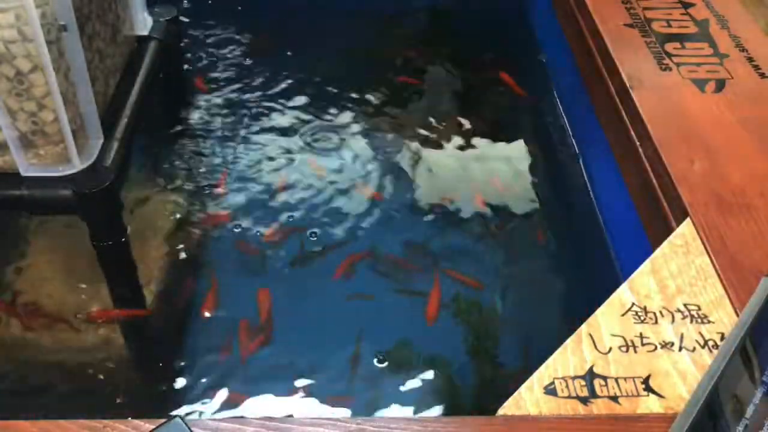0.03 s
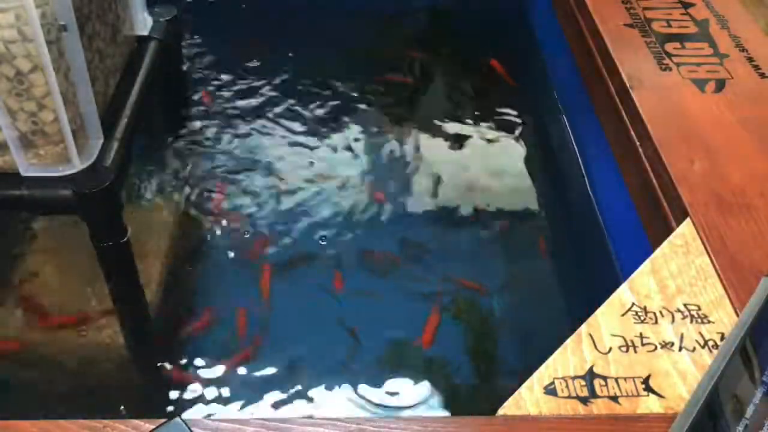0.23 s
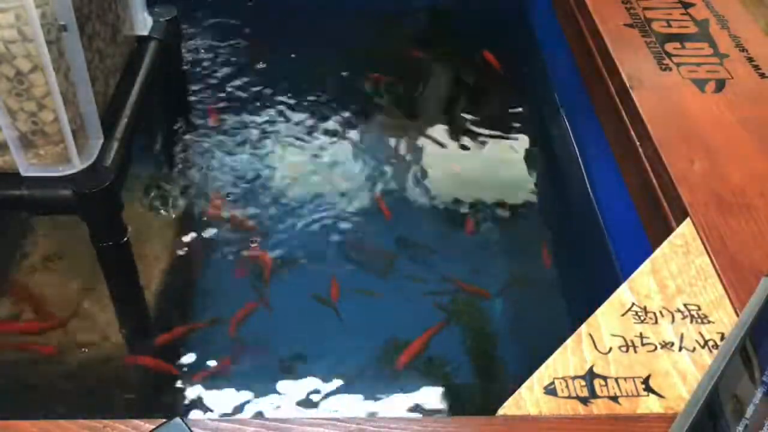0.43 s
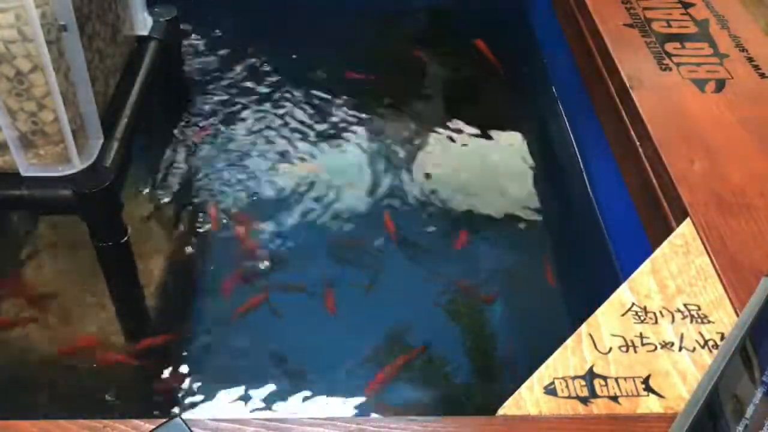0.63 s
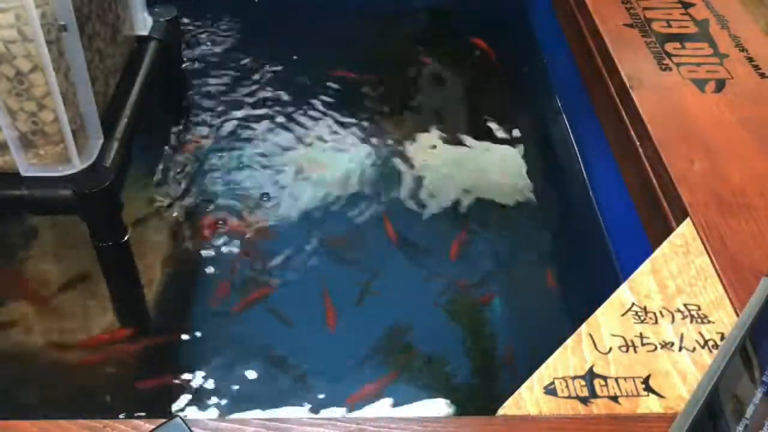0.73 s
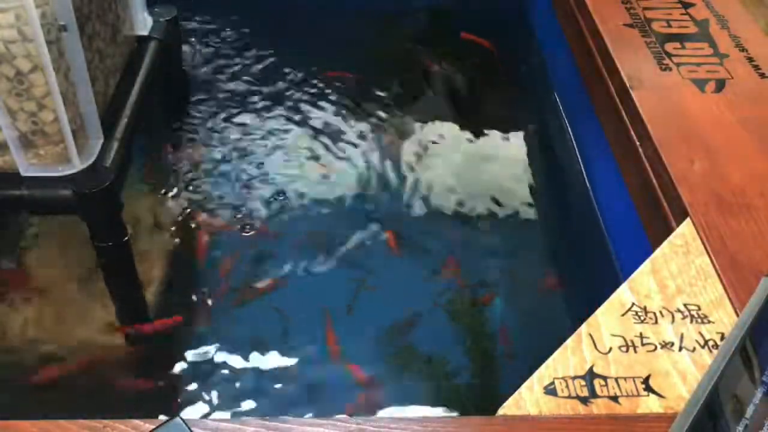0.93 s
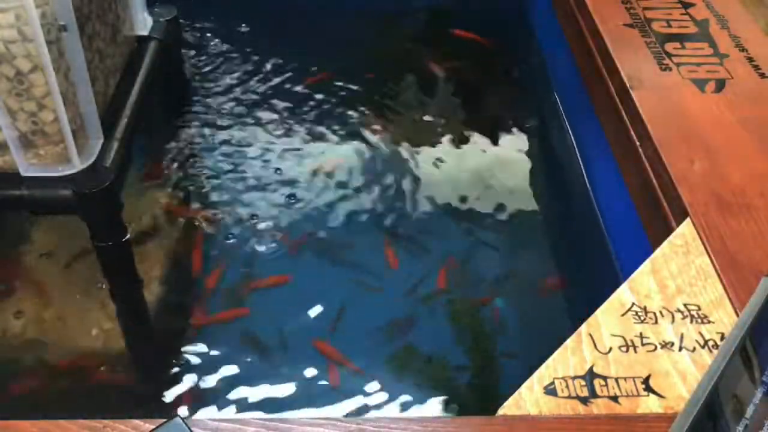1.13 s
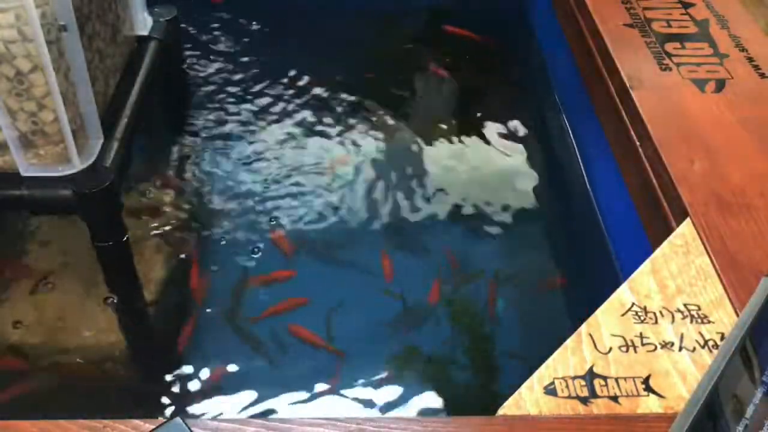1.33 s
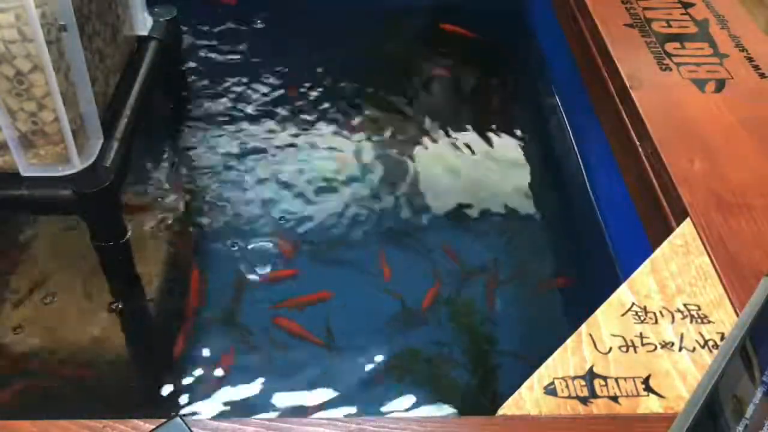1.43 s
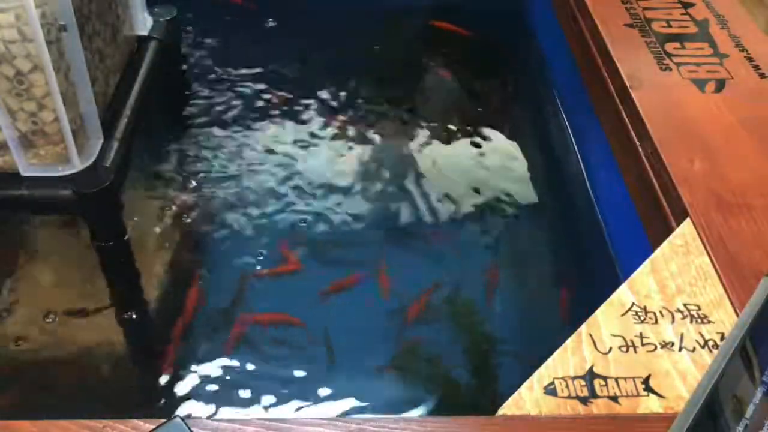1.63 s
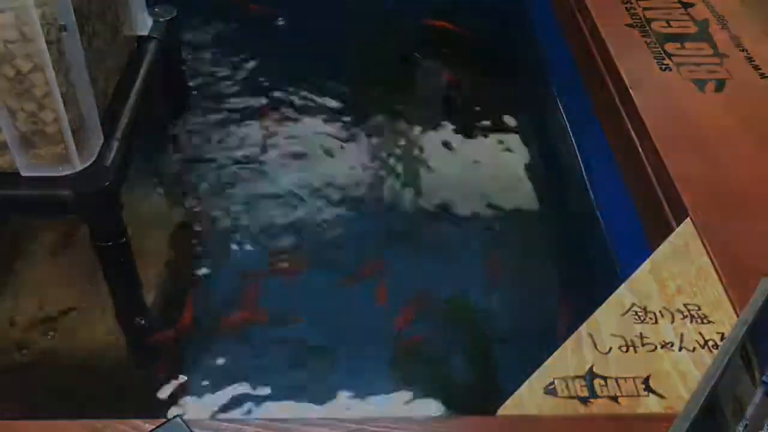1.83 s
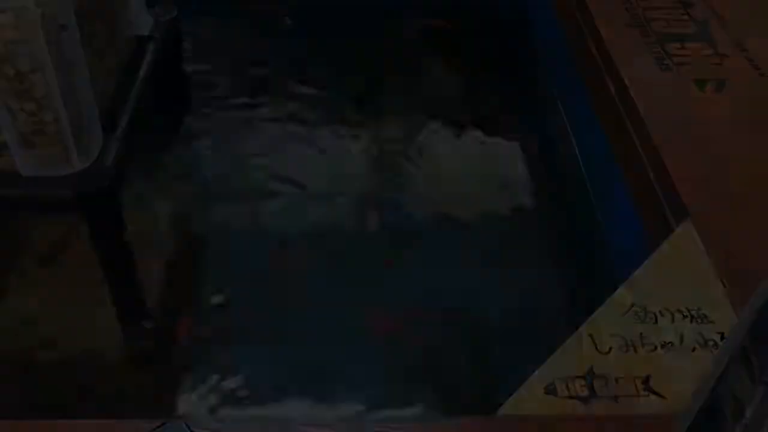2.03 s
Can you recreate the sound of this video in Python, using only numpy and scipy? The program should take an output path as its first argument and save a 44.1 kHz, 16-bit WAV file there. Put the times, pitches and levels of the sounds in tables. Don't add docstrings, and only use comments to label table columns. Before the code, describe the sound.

Water trickles from a filter into an indoor fish pond, with fine hiss, crisp high drips and soft glugs, over a constant low electric pump hum; close microphone, slight room reflections, fading out in the second half.

```python
import sys
import numpy as np
from scipy import signal
from scipy.fft import rfft, irfft, next_fast_len
from scipy.io import wavfile
from scipy.ndimage import uniform_filter1d, map_coordinates

SR = 44100
rng = np.random.default_rng(int(sys.argv[2]) if len(sys.argv) > 2 else 0)


def natural_amplitude(level_db):
    exponent = np.asarray(level_db, float) / 20
    return 10 ** exponent


def int16_out(signal):
    q = np.round(np.clip(np.atleast_2d(signal).T, -1, 1) * 32767)
    wavfile.write(sys.argv[1], SR, q.astype(np.int16))


N = 92610
TIME = np.arange(N) / SR
MAINS_HZ = 50.03


def unit(x):
    return x / np.sqrt(np.mean(x ** 2) + 1e-20)


def wobble(rate):
    knots = rng.standard_normal(int(N * 40 / SR) + 4)
    return map_coordinates(knots, [TIME * rate])


def curve(points):
    return np.interp(TIME, *np.transpose(points))


def filtered(x, response):
    m = next_fast_len(N + 8192)
    return irfft(rfft(x, m) * response(np.fft.rfftfreq(m, 1 / SR)), m)[..., :N]


def coloured(x, points):
    f, v = np.transpose(points)

    def response(hz):
        return natural_amplitude(np.interp(np.log(hz + 1), np.log(f + 1), v, -120, -120))

    return unit(filtered(x, response))


def rush(points, patchy_db):
    z = signal.stft(rng.standard_normal(N + 512), nperseg=256)[2]
    field = uniform_filter1d(rng.standard_normal(z.shape), size=8, axis=0)
    field = uniform_filter1d(field, size=8, axis=1)
    noise = signal.istft(z * natural_amplitude(patchy_db * unit(field)), nperseg=256)[1][:N]
    return coloured(noise, points)


def bubbles(s, gain, hz, cycles, rise, rough, size=700):
    t = np.arange(size) / SR
    life = t * (hz / cycles)[:, None]
    phase = 2 * np.pi * hz[:, None] * t * (1 + rise * life)
    phase = phase + rough * np.cumsum(rng.standard_normal(life.shape), axis=1)
    envelope = np.exp(-3 * life) * (1 - np.exp(-life / 0.044))
    wave = gain[:, None] * np.sin(phase) * envelope
    at = (s * SR).astype(int)[:, None] + np.arange(size)
    return np.bincount(at.ravel(), wave.ravel(), N + size)[:N]


def swarm(count, centre_hz, spread, cycles, size_db, rough, size):
    u, g = rng.random((count, 2)), rng.standard_normal(count)
    hz = np.clip(centre_hz * np.exp(spread * g), 200, 15500)
    gain = natural_amplitude(np.minimum(-size_db * np.log(1 - u[:, 1]), 9.5))
    return unit(bubbles(u[:, 0] * N / SR, gain, hz, cycles + 0 * hz, 0.12, rough, size=size))


def fade():
    start_s, end_s = 1.2, 2.128
    return np.clip((end_s - TIME) / (end_s - start_s), 1e-3, 1)


# (multiple of mains [-], level [dB])
HARMONICS = [(1, -8), (2, 1.5), (3, -34.5), (4, -24.5), (5, -14), (6, -31.5), (7, -31.5), (8, -31.5),
             (9, -21.5), (10, -24.5), (11, -23), (12, -40), (13, -22), (14, -20), (15, -30.5), (16, -39),
             (17, -28.5), (18, -25), (19, -31.5), (20, -21.5), (21, -23), (22, -23.5), (23, -34), (24, -23),
             (25, -28), (26, -26.5), (27, -34), (28, -24.5), (29, -34), (30, -28.5)]
# (time [s], level [dB])
MOTOR_LOAD = [(0, -1.5), (.08, 1), (.23, -2), (.4, 0.5), (.9, 0.5), (1.1, -1), (1.19, 2), (1.3, -1.5),
              (1.45, 0.5), (1.7, 0.5), (1.9, 0.5), (2.1, 4)]


def hum():
    total = 0
    for k, db in HARMONICS:
        level = natural_amplitude(db + 1.04 * wobble(9.2))
        phase = 2 * np.pi * (k * MAINS_HZ * TIME + rng.random()) + 0.13 * wobble(5.9)
        total = total + level * np.sin(phase)
    return np.sqrt(2) * natural_amplitude(-51.5 + curve(MOTOR_LOAD)) * total


# (time [s], rotation [Hz], level [dB])
ROTOR_SPEED = [
    (0, 60.4, -9),
    (.15, 59.67, 3.5),
    (1.15, 57, 3.5),
    (1.38, 56.6, -2),
    (1.48, 66.1, 0.5),
    (2.1, 66.9, -2),
]


def rotor():
    at, hz, effort_db = np.transpose(ROTOR_SPEED)
    level = natural_amplitude(-57.5 + np.interp(TIME, at, effort_db) + wobble(7.9))
    phase = 2 * np.pi * np.cumsum(np.interp(TIME, at, hz)) / SR + 0.19 * wobble(3.3)
    return np.sqrt(2) * level * np.sin(phase)


# (frequency [Hz], density [dB per Hz])
RUMBLE_SPECTRUM = [(20, -32), (40, -6.5), (50, 0), (65, 1.5), (80, -4), (105, -5.5), (128, -8),
                   (150, -15.5), (200, -22.5)]


def rumble():
    return natural_amplitude(-57.5) * rush(RUMBLE_SPECTRUM, patchy_db=-1.2)


# (frequency [Hz], density [dB per Hz])
CASING_SPECTRUM = [(130, -16.5), (230, -1), (310, -12), (520, -4), (800, -12), (1400, -11), (1900, -23.5),
                   (2300, -57)]
# (time [s], level [dB])
CASING_RATTLE = [
    (0, 0.5),
    (.7, -1),
    (1.3, -0.5),
    (1.75, 0),
    (1.9, 1.5),
    (2.1, 7),
]


def casing():
    level = natural_amplitude(-61 + curve(CASING_RATTLE) + 1.2 * wobble(13.63))
    stroke = 1 + 0.27 * np.cos(2 * np.pi * MAINS_HZ * TIME)
    return level * stroke * rush(CASING_SPECTRUM, patchy_db=1.0)


# (time [s], length [s], peak level [dB], pitch [Hz], end over start pitch [-])
AIR_POCKETS = [
    (0, 0.055, -51, 112, 0.88),
    (.27, 0.12, -62, 222, 0.97),
    (.28, .13, -63, 119, 0.96),
    (.5, .14, -61, 126, 1.01),
    (.72, 0.47, -69, 1057, 1.002),
    (.83, .36, -57.5, 108, 1.2),
    (1.96, .11, -73, 151, 1.1),
]


def pipe():
    out = 0
    for s, length, db, hz, glide in AIR_POCKETS:
        u = np.clip((TIME - s) / length, 0, 1)
        phase = 2 * np.pi * hz * length * (u + (glide - 1) * u * u / 2) + 0.85 * wobble(18)
        out = out + np.sqrt(2) * natural_amplitude(db) * np.sin(np.pi * u) ** 2 * np.sin(phase)
    return out / fade()


# (time [s], level [dB])
WATER_FLOW = [
    (0, -61),
    (.15, -60.5),
    (.6, -64),
    (1.2, -64.5),
    (1.7, -63.5),
    (1.95, -61.5),
    (2.1, -60),
]


def flow():
    return natural_amplitude(curve(WATER_FLOW) + 0.22 * wobble(24.66))


# (frequency [Hz], density [dB per Hz])
SPRAY_SPECTRUM = [(1060, -7.5), (1800, -5), (2470, -1), (2840, -4.5), (7640, -5.5), (8750, -4.5),
                  (10300, -5), (14600, -2.5), (15800, 0)]


def spray():
    return rush(SPRAY_SPECTRUM, patchy_db=1.74)


def entrained_air():
    crackle = swarm(count=600, centre_hz=11000, spread=0.3, cycles=23, size_db=-0.5, rough=0.6, size=300)
    crackle = coloured(crackle, [(3000, -36), (6000, -8), (9000, -9), (15800, 0)])
    fizz = swarm(count=350, centre_hz=4510, spread=0.59, cycles=35, size_db=-1.5, rough=0.24, size=500)
    gurgle = swarm(count=120, centre_hz=2480, spread=0.04, cycles=25, size_db=2.5, rough=0.04, size=700)
    glugging = swarm(count=120, centre_hz=726, spread=0.425, cycles=17, size_db=3.5, rough=0.02, size=1500)
    return natural_amplitude(-5.5) * crackle + natural_amplitude(-19) * fizz + natural_amplitude(-27.5) * gurgle + natural_amplitude(-10.5) * glugging


# (time [s], peak level [dB], pitch [Hz], life [cycles])
LOW_DRIPS = [(0.0304, -60, 2440, 82), (0.0428, -55, 2510, 50), (0.121, -58, 2350, 35),
             (0.135, -67, 2460, 43), (.171, -69, 2350, 35), (0.2159, -51.5, 2520, 65),
             (0.2675, -62, 2530, 35), (.3177, -75, 2460, 31), (0.378, -60.5, 2550, 59),
             (0.394, -62, 2340, 45), (.4174, -74, 2470, 35), (0.488, -66, 2440, 35),
             (0.5167, -71, 2450, 40), (.5427, -69, 2425, 35), (.5975, -63, 2480, 35),
             (0.642, -53.5, 2413, 51), (.6863, -62, 2510, 35), (0.7722, -53, 2450, 42),
             (0.7903, -58, 2450, 39), (.8081, -68.5, 2330, 35), (0.8674, -58, 2520, 30),
             (0.886, -56, 2580, 36), (.9921, -63.5, 2510, 35), (1.026, -52, 2353, 63),
             (1.0397, -58, 2520, 55), (1.0514, -57, 2325, 56), (1.1268, -65, 2450, 35),
             (1.1873, -61, 2550, 66), (1.566, -60, 2470, 52), (1.774, -64, 2420, 45),
             (1.799, -72, 2564, 40), (1.83, -66, 2430, 66), (1.8963, -65.5, 2480, 51),
             (1.9122, -64, 2430, 38)]
# (time [s], peak level [dB], pitch [Hz], life [cycles])
HIGH_DRIPS = [(.258, -61, 3700, 45), (.573, -57.5, 4380, 49), (.598, -60.5, 3330, 42),
              (.638, -50, 3530, 30), (.642, -50, 3340, 42), (.68, -58, 3490, 64), (.911, -51, 4620, 40),
              (.925, -61, 4700, 35), (1.145, -60, 5140, 58), (1.198, -58, 4350, 50), (1.259, -60, 3440, 45),
              (1.272, -57, 3470, 55), (1.428, -64, 3550, 38), (1.443, -60.5, 3566, 75),
              (1.482, -60, 3500, 50), (1.722, -63, 3260, 64), (1.868, -67.5, 3370, 81),
              (1.909, -66, 5300, 54), (2.025, -64.5, 4550, 46)]


def drips():
    s, db, hz, cycles = np.transpose(LOW_DRIPS + HIGH_DRIPS)
    ring = bubbles(s, natural_amplitude(db - 3), hz, np.clip(cycles, 30, 90), rise=0.012, rough=0.05, size=1500)
    splash = bubbles(s, natural_amplitude(db - 8), 1.116 * hz, 12 + 0 * hz, rise=0, rough=0.27, size=400)
    return ring + splash


# (time [s], peak level [dB], pitch [Hz], life [cycles])
DROPLETS = [(0.0458, -49, 14600, 36), (0.2553, -43.5, 8860, 42), (0.4614, -49, 14000, 40),
            (0.616, -47.5, 11600, 40), (0.7287, -44, 14400, 37), (0.7741, -48, 14400, 40),
            (0.8305, -49, 15000, 40), (0.8643, -41.5, 14350, 35), (0.8865, -45, 14100, 40),
            (0.9318, -50, 14600, 43), (0.945, -45, 14300, 40), (0.9762, -49.5, 12600, 40),
            (0.9926, -51, 14400, 36), (1.0545, -63, 11200, 37), (1.0545, -40, 13900, 25),
            (1.2875, -46, 12700, 35), (1.4765, -52.5, 8840, 37), (1.494, -50, 13800, 40),
            (1.5422, -47.5, 8860, 27), (1.6492, -51, 14500, 40), (1.6663, -46, 15000, 32),
            (1.797, -55, 10800, 34),
            (0.057, -51, 6140, 33), (.3451, -56.5, 4600, 25), (.3546, -51, 5770, 23),
                   (.5372, -58, 5910, 30), (.5606, -57, 6600, 30), (.7088, -53, 6350, 30),
                   (.8255, -61, 6030, 30), (0.9105, -51, 5340, 18), (1.0136, -59, 5960, 45),
                   (1.3139, -58, 7500, 30), (1.3314, -52.5, 7100, 30), (1.373, -54, 6230, 28),
                   (1.4825, -64, 6580, 30), (1.5419, -62, 5500, 11), (1.584, -59, 5950, 30),
                   (1.6215, -58.5, 6700, 34), (1.8253, -63, 6074, 31), (1.991, -61, 2400, 9),
                   (2.059, -70, 2400, 7.5),
            (0.2568, -48.5, 8400, 35),
    (.837, -54, 11460, 54),
    (1.0484, -48, 13400, 50),
    (1.0734, -55, 9060, 70),
    (1.2644, -52, 14500, 55),
    (1.341, -57, 14000, 55),
    (1.416, -51, 13700, 50),
    (1.457, -56, 13000, 53),
    (1.485, -60, 9100, 45),
    (1.505, -53, 15200, 55),
]


def droplets():
    s, db, hz, cycles = np.transpose(DROPLETS)
    s = s + 0.0008
    ring = bubbles(s, natural_amplitude(db - 1.5), hz, np.clip(1.43 * cycles, 5, 120), rise=0.012, rough=0.4, size=400)
    crack = bubbles(s, natural_amplitude(db - 2.5), 0.95 * hz, 1.12 * cycles, rise=0, rough=0.68, size=400)
    crack = filtered(crack, lambda f: f ** 4 / (f ** 4 + (0.12 * SR) ** 4))
    return ring + crack


# (time [s], peak level [dB], pitch [Hz])
DEEP_GLUGS = [
    (.058, -52.5, 1646),
    (0.239, -55, 1440),
    (.3, -54.5, 680),
    (.63, -52, 1410),
    (1.012, -50.5, 494),
    (1.163, -57, 606),
    (1.183, -51, 513),
    (1.243, -52, 550),
    (1.535, -53.5, 538),
]


def glugs():
    s, db, hz = np.transpose(DEEP_GLUGS)
    return bubbles(s, natural_amplitude(db), hz, 22 + 0 * hz, rise=0.045, rough=0.025, size=2500)


# (delay [s], level [dB])
TANK_WALLS = [
    (.0027, -10),
    (.0061, -13),
    (.0098, -24),
    (0.0148, -12.5),
]


def room(x):
    t60_s, tail_db = 0.66, -15.5
    t = np.arange(SR // 4) / SR
    tail = rng.standard_normal(len(t)) * natural_amplitude(-60 * t / t60_s) * (t > 0.003)
    tail = natural_amplitude(tail_db) * tail / np.linalg.norm(tail)
    delays = [round(s * SR) for s, db in TANK_WALLS]
    walls = np.bincount(delays, [natural_amplitude(db) for s, db in TANK_WALLS], len(t))
    return x + signal.fftconvolve(x, tail + walls)[:N]


def scene():
    pump = hum() + rotor() + rumble() + casing()
    singing = pipe()
    strength = flow()
    hiss = strength * spray()
    bubbling = strength * entrained_air()
    drops = (drips() + droplets() + glugs()) / fade()
    return (pump + singing + hiss + room(bubbling + drops))[None]


# (centre [Hz], width [Hz], level [dB])
MIC_RESONANCES = [(2520, 120, 2), (7710, 390, -4), (8680, 680, 1.5), (10400, 580, -4), (14400, 880, 0)]


def microphone(x):
    def response(hz):
        db = sum(peak * np.exp(-0.5 * ((hz - c) / w * 2) ** 2) for c, w, peak in MIC_RESONANCES)
        return natural_amplitude(db) * (hz < 15740)

    return filtered(x, response)


def band_limit(x):
    return signal.sosfilt(signal.butter(12, 16410, fs=SR, output="sos"), x)


def record(dry):
    mix = microphone(dry) * fade()
    return band_limit(mix)


dry = scene()
out = record(dry)
int16_out(out)
```